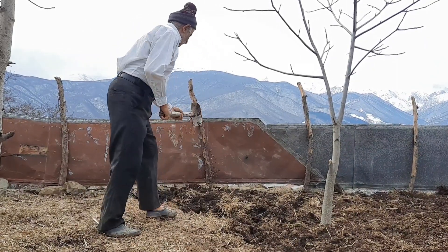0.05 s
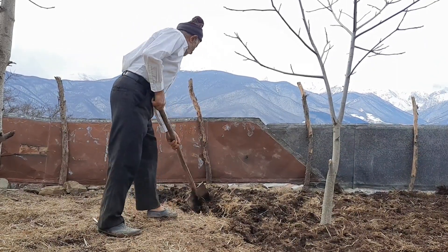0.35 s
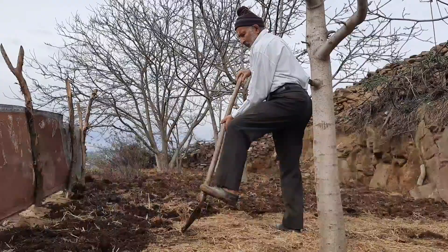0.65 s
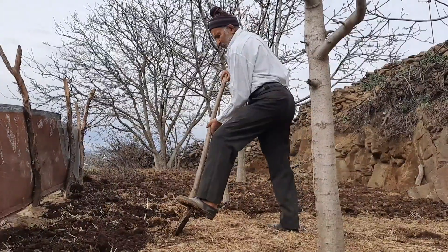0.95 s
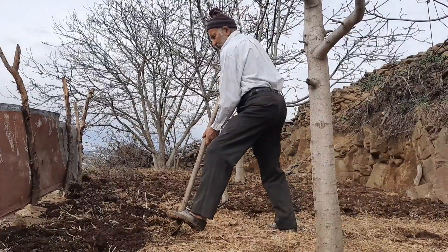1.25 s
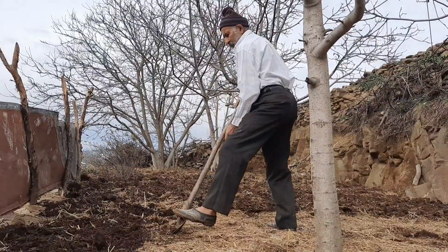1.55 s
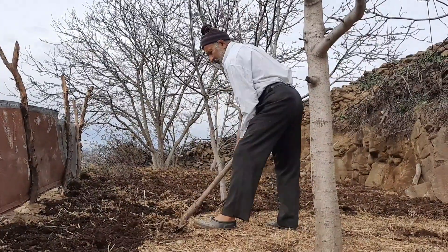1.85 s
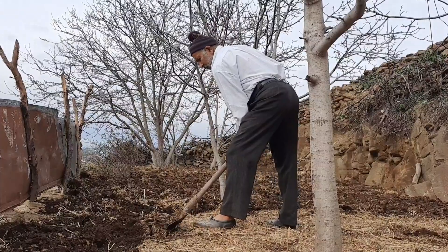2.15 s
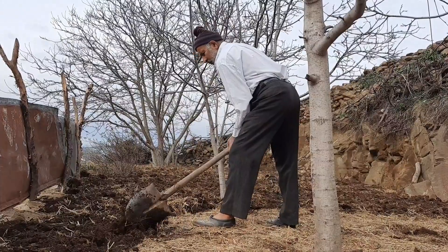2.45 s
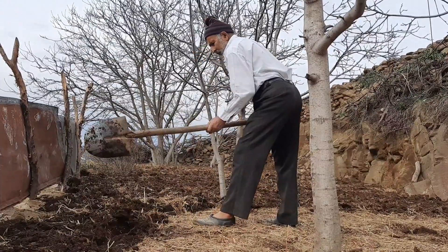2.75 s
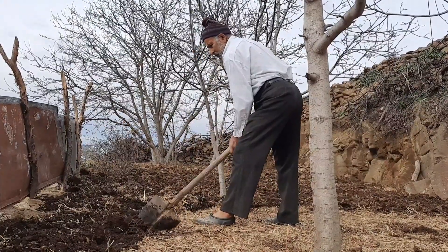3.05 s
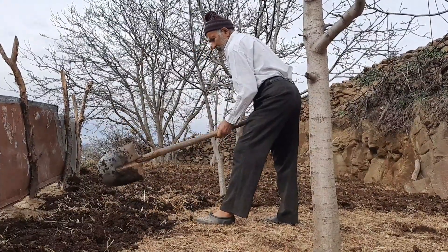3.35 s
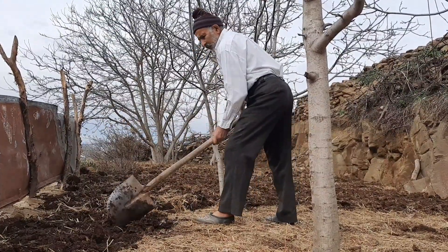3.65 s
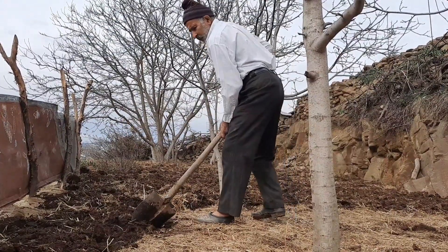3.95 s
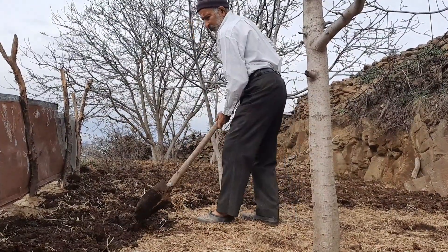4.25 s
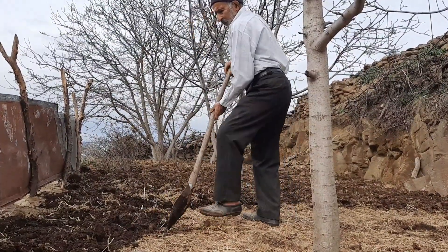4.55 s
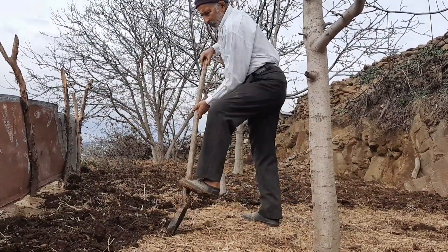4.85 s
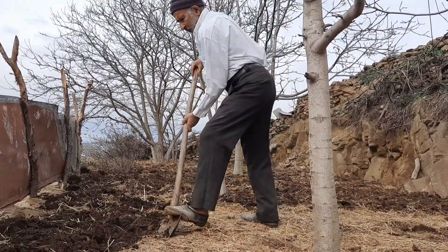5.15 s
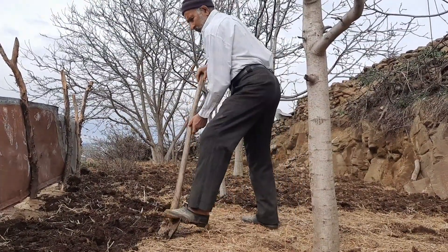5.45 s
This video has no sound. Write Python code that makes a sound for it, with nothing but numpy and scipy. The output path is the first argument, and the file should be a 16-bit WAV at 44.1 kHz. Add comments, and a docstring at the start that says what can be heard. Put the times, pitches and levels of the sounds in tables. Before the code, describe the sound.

Soft gusts rumble on the right of the microphone while a shovel works garden soil outdoors on the left. It starts with a hard clink against stone, followed by quiet scraping and crackling dry straw. Past the middle, earth lands with a slap and a thud, a second blow packs it down, and another crunchy push follows. There is barely any echo.

```python
"""In a walled orchard, a long-handled steel shovel digs straw-covered soil. It clinks on a stone, is
trodden into the ground, levers up a clod, drops it and slaps it flat. Soil crunches and straw snaps:
showers of tiny clicks that also set the blade ringing. Earth lands in thuds of low noise.
The left microphone hears the work; the right one catches little but wind."""
import sys
import numpy as np
from scipy import signal
from scipy.fft import rfft, irfft, next_fast_len
from scipy.io import wavfile
from scipy.ndimage import uniform_filter1d, map_coordinates

SR = 44100
rng = np.random.default_rng(int(sys.argv[2]) if len(sys.argv) > 2 else 0)


def wav_out(sig):
    """Save sig, one row per channel (or a flat mono array), as 16-bit PCM at SR to the path in sys.argv[1]."""
    wavfile.write(sys.argv[1], SR, np.round(np.clip(np.atleast_2d(sig).T, -1, 1) * 32767).astype(np.int16))


N = 246959

# Levels compare rows within a table. fade_s is the time a sound takes to fall by 60 dB.
# the blade pushes through earth: start_s, length_s, crunch_db, grind_db
BLADE_STROKES = [(0.0, 0.068, -72, -80), (0.306, 0.09, -58.5, -94), (0.373, 0.098, -54.5, -61),
                 (0.455, 0.23, -75, -98), (0.825, 0.19, -63, -74), (0.96, 0.19, -55, -60.5),
                 (1.113, 0.15, -61.5, -63.5), (1.3, 0.19, -77.5, -82.5), (1.505, 0.12, -69, -70.5),
                 (1.683, 0.072, -64.5, -67.5), (1.787, 0.16, -73.5, -74), (1.948, 0.11, -73, -70),
                 (2.372, 0.25, -66, -82), (2.637, 0.18, -83, -90), (2.841, 0.16, -77.5, -94.5),
                 (3.108, 0.19, -67.5, -91), (3.3, 0.47, -93.5, -98.5), (3.786, 0.11, -68, -74),
                 (3.882, 0.15, -68, -91.5), (4.067, 0.29, -67.5, -81.5), (4.391, 0.21, -78, -88),
                 (4.61, 0.18, -66.5, -74), (4.732, 0.27, -74.5, -101), (4.93, 0.18, -49.5, -57),
                 (5.074, 0.091, -61.5, -49.5), (5.238, 0.3, -77, -90.5)]
# strength of the breeze: time_s, level_db
BREEZE = [(0.0, -80), (0.24, -46), (0.3, -66), (0.6, -75.5), (0.72, -53), (1.62, -53), (1.92, -63.5),
          (1.98, -53.5), (2.46, -49.5), (3.24, -57), (3.3, -66.5), (3.72, -51), (3.9, -59), (4.44, -52),
          (4.62, -59.5), (5.04, -48), (5.4, -60.5), (5.58, -55.5)]
# single puffs of wind: middle_s, level_db
PUFFS = [(0.143, -48.5), (0.204, -42.5), (2.183, -41), (4.279, -41.5), (4.412, -49), (4.804, -40)]
# light brushes over straw: middle_s, level_db, half_width_s
STRAW_BRUSHES = [(0.035, -58.5, 0.052), (1.715, -53, 0.03), (2.781, -74.5, 0.088), (3.22, -69.5, 0.091),
                 (3.45, -71.5, 0.28), (4.17, -62, 0.11), (4.499, -62.5, 0.083), (5.019, -55, 0.028)]
# straw, roots and grit break: start_s, level_db, fade_s, pitch_hz, ring_db
STRAW_SNAPS = [(0.195, -51, 0.13, 7700, -31), (0.577, -52, 0.18, 3580, -19), (0.856, -47, 0.022, 6960, 0),
               (1.044, -48, 0.057, 6600, -19), (1.8173, -50.5, 0.011, 5160, 7),
               (1.8564, -48.5, 0.012, 5970, -3.5), (1.9853, -42, 0.02, 1930, -13),
               (2.4042, -56.5, .04, 4490, -19.5), (2.4853, -49.5, 0.071, 6300, -4.5),
               (2.551, -41, 0.02, 5970, -8.5), (2.9043, -57, 0.037, 6500, -24.5),
               (2.9703, -54, 0.022, 7250, -18), (3.6346, -60.5, 0.019, 7500, -25.5),
               (3.7836, -34, 0.047, 2000, -3), (3.9407, -53.5, 0.078, 5100, -3),
               (4.3012, -51, 0.15, 2830, -5.5), (4.6244, -43.5, 0.15, 2850, -18),
               (4.6585, -39.5, 0.057, 4460, -29), (4.9203, -52, 0.15, 2520, -16),
               (4.9541, -41.5, 0.052, 3060, -15), (4.985, -37.5, 0.039, 3350, -10),
               (5.0105, -31.5, 0.031, 3440, 16), (5.086, -43, 0.038, 6350, -14),
               (5.114, -34.5, .045, 2350, -22), (5.1289, -48, 0.31, 2275, -23),
               (5.328, -53.5, 0.041, 5600, -4.5), (5.3579, -51, 0.029, 2700, -10),
               (5.555, -58, 0.052, 5920, -20.5)]
# the blade hits stone or clod: start_s, level_db, rise_s, fade_s, ring_db, stoniness (0 to 1)
BLADE_HITS = [(0.3481, -28.5, .0005, 0.051, -10, 0.16), (0.3568, -9.5, 0.00023, 0.037, 7, 0.82),
              (0.3698, -18.5, 0.0004, 0.061, -3.5, 0.62), (2.5512, -42.5, 0.00017, 0.07, 4, 0),
              (3.0204, -14, 0.0027, 0.066, -1, 0.01), (3.038, -24.5, 0.0039, 0.17, -6, 0.29),
              (3.112, -37, 0.0022, 0.022, -17, 0.42), (3.682, -52, 0.0035, 0.068, -20, 0.51),
              (3.6913, -35.5, 0.0023, 0.11, -31, 0.1), (3.6957, -28, 0.00086, 0.15, -23, 0.1),
              (3.708, -31.5, 0.0027, 0.17, -24, 0.44), (3.762, -38, 0.0059, 0.12, -16, 0.2)]
# earth lands or is packed down: start_s, level_db, fade_s, deep_thump_db
EARTH_THUDS = [(0.358, -51.5, 0.3, -3), (1.048, -59.5, 0.96, -4), (1.665, -61, 0.16, -20),
               (1.732, -60, 0.2, -7), (3.021, -37, 0.24, -12), (3.082, -45, 0.18, -3),
               (3.192, -59.5, 0.25, -14), (3.694, -37.5, 0.19, -5), (3.728, -50, 0.27, -2),
               (3.782, -41, 0.068, -24.5), (4.919, -47.5, 0.08, -23.5), (5.0, -56, 0.77, -13),
               (5.077, -57, 0.3, -12), (5.554, -53, 0.12, -2)]
# the buried blade rubs: start_s, length_s, level_db, pitch_hz
BURIED_RUBS = [(0.451, 0.047, -59.5, 1230), (0.495, 0.14, -74.5, 1100), (1.78, 0.13, -74, 831),
               (1.985, 0.018, -61, 1206), (2.02, 0.44, -74, 877), (2.354, 0.63, -78, 929)]
# thin, close clicks: start_s, level_db
CLOSE_TICKS = [(4.27, -44), (4.2832, -35.5), (4.339, -46)]
# the notes the steel blade rings at: pitch_hz, level_db
BLADE_NOTES = [(851, -9), (1120, -11), (1319, -11), (1920, -5), (2063, -6), (2390, -10), (2650, -9),
               (2746, -3), (2880, 2), (3172, -7), (3458, -7), (3601, 1), (3684, -4), (3962, -3), (4332, -2),
               (4562, -8), (6135, -7), (6816, -6), (7063, -9), (7623, -7)]
# the tone of one snap: multiple_of_pitch, level_db
SNAP_TONE = [(.2, -22.5), (.45, -18), (.72, -11.5), (1, 0.5), (1.3, -11), (2.198, -12), (4.998, -24.5)]
# how long the orchard echoes: pitch_hz, fade_s
ECHO_FADES = [(200, 0.26), (1000, 0.16), (3000, 0.11), (14000, 0.28)]

# Each tone says how strong a sound is from low to high: pitch_hz, level_db
CRUNCH_TONE = [(200, -19.5), (1200, -12.5), (1800, -6.5), (2300, 2), (3300, 0.5), (4800, 1.5), (7000, -3),
               (11000, -3), (16000, -6.5)]  # loose crumbs
GRIND_TONE = [(100, -20), (220, -9.5), (350, 0.5), (600, -15), (900, 1), (1250, -7), (1600, -0.5),
              (2300, 2), (3200, -4.5), (6000, -27)]  # packed earth
WIND_TONE = [(15, -17), (35, 0), (60, 9.5), (100, -3.5), (150, -15.5), (220, -28.5), (320, -33),
             (600, -48.5), (2000, -62.5)]
STONE_TONE = [(100, -38.5), (650, -22), (850, -15), (1600, -11), (2200, -3.5), (2950, 2.5), (3700, -3),
              (4500, -8), (5400, -13), (7200, -4.5), (11000, -27.5), (13500, -25.5), (16000, -23.5)]
CLOD_TONE = [(100, -28.5), (600, -16.5), (900, -10), (1600, -9.5), (2000, -4.5), (2900, -1), (3500, -4),
             (4100, -0.5), (5000, 0), (7500, -13), (11500, -5.5), (13500, -14.5), (16000, -11.5)]
LUMP_TONE = [(60, -18), (140, -4.5), (210, -13), (310, 1.5), (420, -4), (560, -15), (900, -16.5),
             (2000, -43.5)]  # soft earth landing
VALLEY_TONE = [(20, -11), (60, -5.5), (100, 2), (200, -17.5), (300, -6), (430, -16), (600, -20.5),
               (1200, -26.5), (2500, -31), (5000, -34), (7300, -32.5), (16000, -33)]
HISS_TONE = [(20, 5.5), (320, 12), (600, 5), (1500, 1.5), (4000, -3), (10000, -6.5), (16000, -2)]
LEFT_MIC_TONE = [(20, 2.5), (5200, -0.5), (7400, 8.5), (8100, 3.5), (8900, -8), (9700, -4.5), (11200, 2),
                 (16000, 1.5)]  # what the left microphone boosts and cuts
STRAW_TONE = [(2000, -28.0), (7000, -10.5), (12000, -5.5), (16000, -2.5)]
GROUND_TONE = [(25, -19.5), (60, -2), (120, 4), (250, -35.5)]
FLUTTER_TONE = [(20, -2.5), (110, 0), (250, -12), (450, -10.5), (900, -33.5), (2000, -74)]
TICK_TONE = [(500, -17), (5000, -17), (9500, -2), (16000, 2.5)]


def gain(db):
    """Turn decibels into a number to multiply by."""
    return 10 ** (np.asarray(db) / 20)


def normalised(x):
    """Scale x to an average power of 1."""
    return x / np.sqrt(np.mean(x ** 2) + 1e-20)


def as_strong_as(x, other):
    """Scale x to the same average power as another signal."""
    return normalised(x) * np.sqrt(np.mean(other ** 2))


def at_pitch(table, hz):
    """Read between a table's rows, with pitch spaced in octaves."""
    pitches, values = np.transpose(table)
    return np.interp(np.log(hz + 1), np.log(pitches + 1), values)


def over_time(table):
    """Join (time_s, value) points with straight lines, one value per sample."""
    times, values = np.transpose(table)
    return np.interp(np.arange(N) / SR, times, values)


def wobble(per_s):
    """A smooth curve through per_s random points a second."""
    points = rng.standard_normal(int(N * per_s / SR) + 4)
    return map_coordinates(points, [np.arange(N) * per_s / SR])


def filtered(x, gain_at):
    """Turn each pitch in x up or down by gain_at(hz)."""
    size = x.shape[-1]
    padded = next_fast_len(size + 2048, True)
    hz = np.fft.rfftfreq(padded, 1 / SR)
    return irfft(rfft(x, padded) * gain_at(hz), padded)[..., :size]


def with_tone(x, tone):
    """Give x a tone, at an average power of 1."""
    return normalised(filtered(x, lambda hz: gain(at_pitch(tone, hz))))


def noise(size, tone):
    """Steady noise with the given tone."""
    return with_tone(rng.standard_normal(size), tone)


def grains(size, per_s, spread_db):
    """Tiny breaks: clicks at random moments and of very unequal strength."""
    clicks = (rng.random(size) < per_s / SR) * rng.standard_normal(size)
    return clicks * gain(spread_db * rng.standard_normal(size))


def burst(t, rise_s, fade_s):
    """A loudness shape that swells to 1 and dies away."""
    shape = (1 - np.exp(-t / rise_s)) * gain(-60 * t / fade_s)
    return shape / shape.max()


def add(track, start_s, sound):
    """Mix a sound into the track at start_s."""
    part = track[round(start_s * SR):][:len(sound)]
    part += sound[:len(part)]


def stroke(start_s, length_s, bite_s=0.008, arch_db=12.5, fade_db_per_s=170):
    """The loudness of one push: it bites quickly, is strongest midway, then trickles out."""
    t = np.maximum(np.arange(N) / SR - start_s, 0)
    off_centre = 2 * np.minimum(t / length_s, 1) - 1
    db = -arch_db * off_centre ** 2 - fade_db_per_s * np.maximum(t - length_s, 0)
    return np.minimum(t / bite_s, 1) * gain(db)


def patchy(x, depth_db, width_hz, life_s):
    """Crumbs of changing size make narrow bands of pitch come and go."""
    bands = signal.stft(x, nperseg=512)[2]  # rows are pitches, columns are moments
    patches = rng.standard_normal(bands.shape)
    for axis, span in enumerate([width_hz * 512 / SR, life_s * SR / 256]):
        patches = uniform_filter1d(patches, max(1, round(span)), axis)
    bands = bands * gain(depth_db * normalised(patches))
    return normalised(signal.istft(bands, nperseg=512)[1][:len(x)])


def blade_ring(force, fade_s=0.05):
    """A force rings the steel, with a new mix of its notes each time; earth soon stills it."""
    t = np.arange(SR // 14) / SR
    hz, db = np.transpose(BLADE_NOTES)
    strengths = gain(db + rng.normal(0, 2.1, len(hz)))
    notes = np.sin(2 * np.pi * (np.outer(hz, t) + rng.random((len(hz), 1))))
    ring = (strengths @ notes) * gain(-60 * t / fade_s)
    return as_strong_as(signal.fftconvolve(force, ring)[:len(force)], force)


def soil_scrape():
    """The blade moves in small jerks: crumbs crackle along the steel, packed earth grinds lower."""
    crunch_level, grind_level = np.zeros(N), np.zeros(N)
    for start_s, length_s, crunch_db, grind_db in BLADE_STROKES:
        effort = stroke(start_s, length_s)
        crunch_level += gain(crunch_db) * effort
        grind_level += gain(grind_db) * effort
    jerks_db = 1.3 * wobble(per_s=83)
    crumbs = grains(N, per_s=17000, spread_db=3.5)
    crumbs = with_tone(patchy(crumbs, depth_db=3.3, width_hz=350, life_s=0.04), CRUNCH_TONE)
    packed = grains(N, per_s=7800, spread_db=1.5)
    packed = with_tone(patchy(packed, depth_db=3.5, width_hz=170, life_s=0.025), GRIND_TONE)
    crunch = crunch_level * gain(jerks_db + 5.5) * (crumbs + gain(-22.5) * blade_ring(crumbs))
    grind = grind_level * gain(jerks_db + 4.5) * packed
    return crunch + grind


def wind():
    """Swirling air rumbles on the microphone; now and then it bursts in a low puff."""
    swirl_db = 2.86 * wobble(per_s=11)
    out = gain(over_time(BREEZE) + swirl_db - 0.5) * noise(N, WIND_TONE)
    swell = np.hanning(SR // 14)
    for middle_s, db in PUFFS:
        puff = swell * noise(len(swell), WIND_TONE)
        add(out, middle_s - len(swell) / SR / 2, gain(db + 1) * puff)
    return out


def straw_rustle():
    """Dry straw brushed lightly gives a thin, airy rustle."""
    swell, t = np.zeros(N), np.arange(N) / SR
    for middle_s, db, half_width_s in STRAW_BRUSHES:
        swell += gain(db) * np.exp(-((t - middle_s) / half_width_s) ** 2)
    return swell * with_tone(grains(N, per_s=8700, spread_db=3), STRAW_TONE)


def impact(tone, rise_s, fade_s, ring_db):
    """A brief shower of tiny breaks; part of its energy rings the blade."""
    t = np.arange(SR // 5) / SR
    shape = burst(t, rise_s, fade_s)
    crush = with_tone(grains(len(t), per_s=30000, spread_db=0), tone) * shape
    return as_strong_as(crush + gain(ring_db) * blade_ring(crush), shape)


def straw_snaps():
    """Stalks and grit give way one at a time; the smaller the piece, the higher its pitch."""
    out = np.zeros(N)
    for start_s, db, fade_s, hz, ring_db in STRAW_SNAPS:
        tone = [(hz * multiple, level_db) for multiple, level_db in SNAP_TONE]
        snap = impact(tone, rise_s=0.00076, fade_s=fade_s, ring_db=ring_db)
        add(out, start_s, gain(db - 1) * snap)
    return out


def blade_hits():
    """Stone gives a hard clink near 3 kHz; a clod bursts with a broad, gritty slap."""
    out, hz = np.zeros(N), np.geomspace(100, 16000, num=80)
    for start_s, db, rise_s, fade_s, ring_db, stoniness in BLADE_HITS:
        blend_db = stoniness * at_pitch(STONE_TONE, hz) + (1 - stoniness) * at_pitch(CLOD_TONE, hz)
        tone = np.column_stack([hz, blend_db])
        add(out, start_s, gain(db - 1) * impact(tone, rise_s, fade_s, ring_db))
    return out


def earth_thuds():
    """Soft earth takes a blow without ringing; heavy lumps shake the ground too."""
    out, t = np.zeros(N), np.arange(SR // 2) / SR
    for start_s, db, fade_s, deep_thump_db in EARTH_THUDS:
        lump = noise(len(t), LUMP_TONE) * burst(t, rise_s=0.0037, fade_s=fade_s)
        ground = noise(len(t), GROUND_TONE) * burst(t, rise_s=0.015, fade_s=fade_s)
        add(out, start_s, gain(db) * (lump + gain(deep_thump_db) * ground))
    return out


def buried_rub():
    """The buried blade rubs faintly as it levers the clod: one rough, hollow note per stroke."""
    out, t = np.zeros(N), np.arange(N) / SR
    flutter = noise(N, FLUTTER_TONE)  # smears a pure note into a band of noise
    for start_s, length_s, db, hz in BURIED_RUBS:
        out += gain(db + 8.5) * stroke(start_s, length_s) * flutter * np.sin(2 * np.pi * hz * t)
    return out


def close_ticks():
    """Very short, thin clicks right by the microphone."""
    out, t = np.zeros(N), np.arange(SR // 20) / SR
    shape = burst(t, rise_s=0.0002, fade_s=0.012)
    for start_s, db in CLOSE_TICKS:
        add(out, start_s, gain(db) * shape * noise(len(t), TICK_TONE))
    return out


def orchard_echo(x):
    """Fence, bank and trees scatter the sound into a short tail."""
    hz, t, bands = signal.stft(rng.standard_normal(SR // 2), SR, nperseg=256)
    fade = gain(-60 * t / at_pitch(ECHO_FADES, hz)[:, None])
    tail = signal.istft(bands * fade, SR, nperseg=256)[1]
    delayed = np.pad(x, (SR // 100, 0))  # 10 ms late
    return signal.fftconvolve(delayed, tail / np.linalg.norm(tail))[:N]


def scene():
    """Digging and the valley's murmur on the left; wind, hiss and a faint echo on the right."""
    digging = blade_hits() + straw_snaps() + earth_thuds() + soil_scrape() + straw_rustle() + buried_rub()
    digging += gain(-18.5) * orchard_echo(digging)
    valley = gain(-64.5) * noise(N, VALLEY_TONE)
    left = filtered(digging + valley + close_ticks(), lambda hz: gain(at_pitch(LEFT_MIC_TONE, hz)))
    right = wind() + gain(-77.5) * noise(N, HISS_TONE) + gain(-49.5) * orchard_echo(digging)
    return np.array([left, right])


def record(dry):
    """The level dips briefly once, and the highest treble is cut off sharply."""
    dip_db = over_time([(0.648, 0), (0.656, -30), (0.668, -30), (0.675, 0)])
    top_hz, steepness = 16000, 120
    return gain(-4.0) * filtered(dry * gain(dip_db), lambda hz: 1 / (1 + (hz / top_hz) ** steepness))


dry = scene()
out = record(dry)
wav_out(out)
```